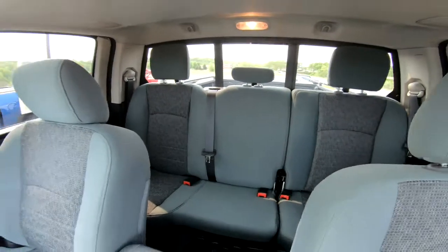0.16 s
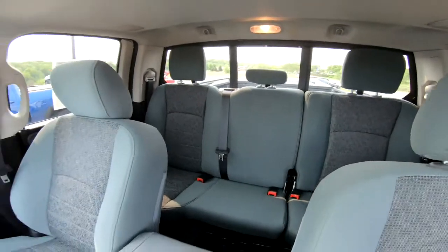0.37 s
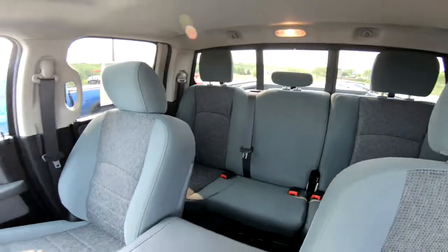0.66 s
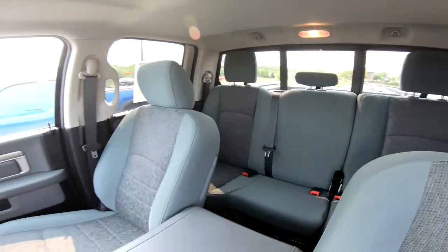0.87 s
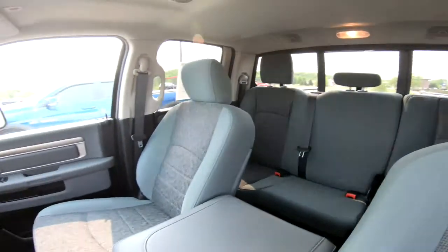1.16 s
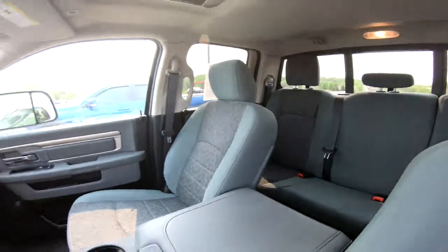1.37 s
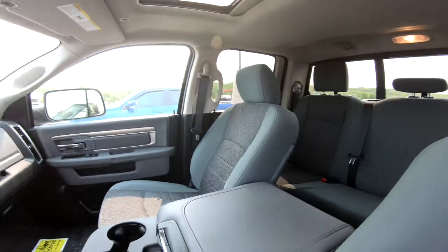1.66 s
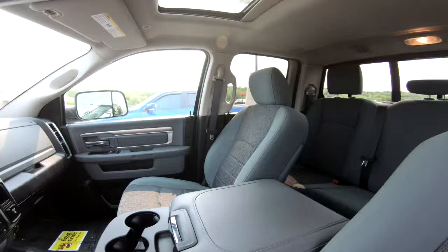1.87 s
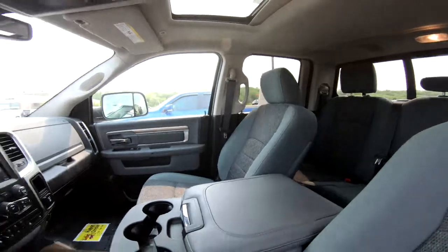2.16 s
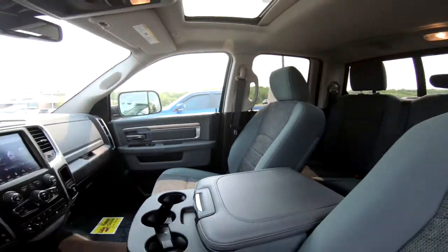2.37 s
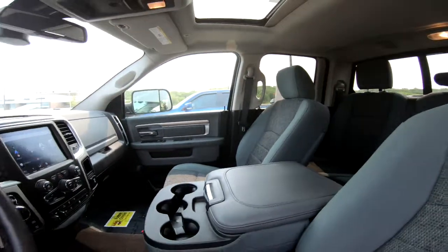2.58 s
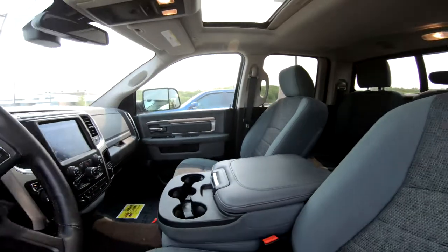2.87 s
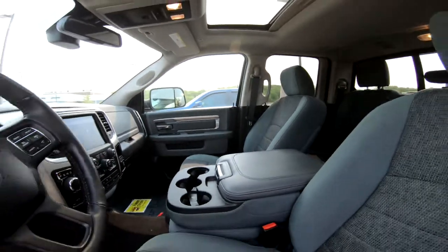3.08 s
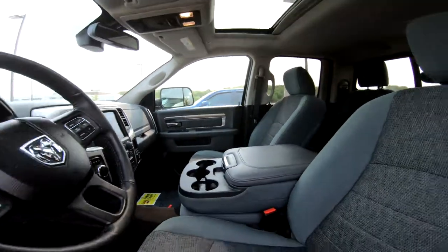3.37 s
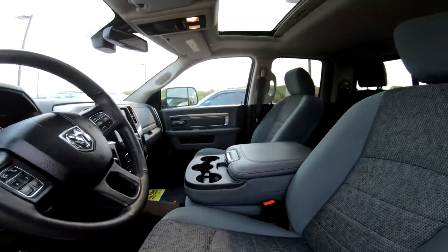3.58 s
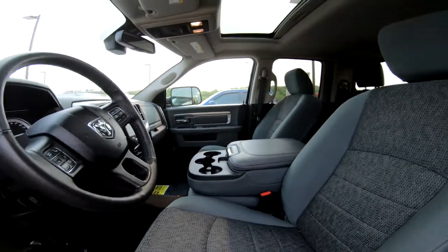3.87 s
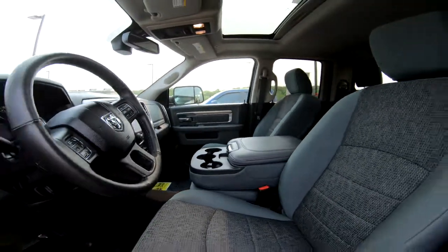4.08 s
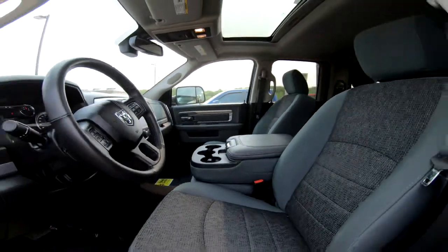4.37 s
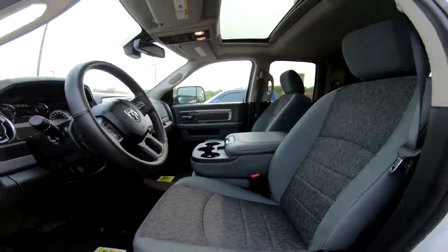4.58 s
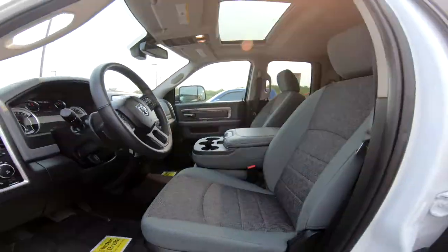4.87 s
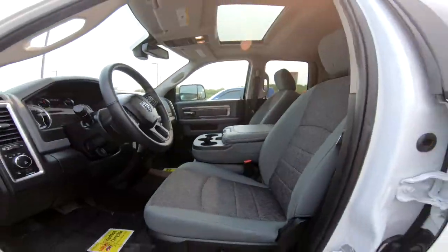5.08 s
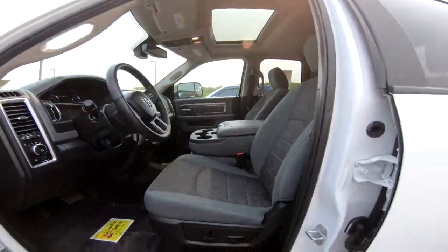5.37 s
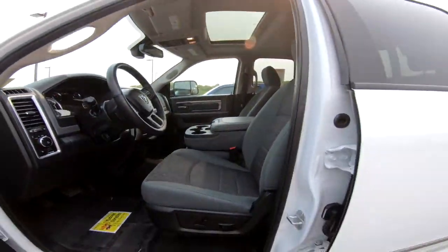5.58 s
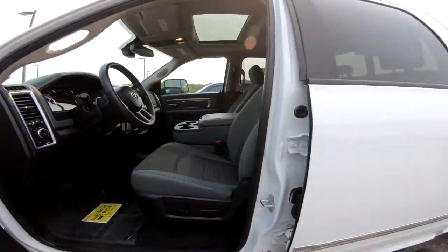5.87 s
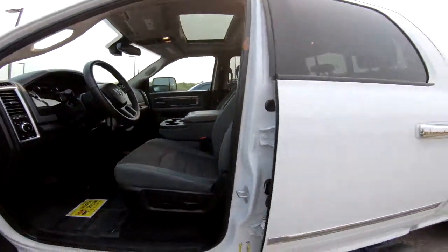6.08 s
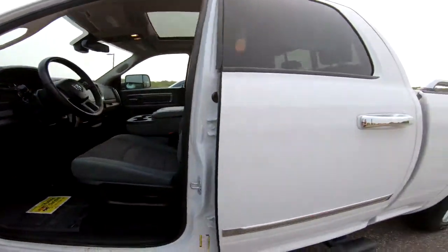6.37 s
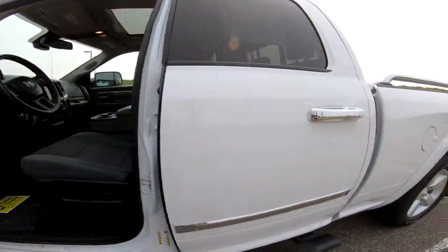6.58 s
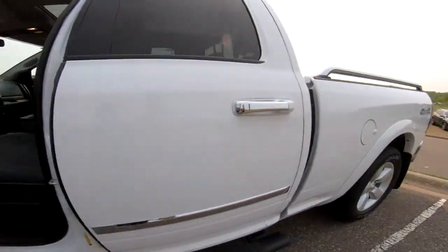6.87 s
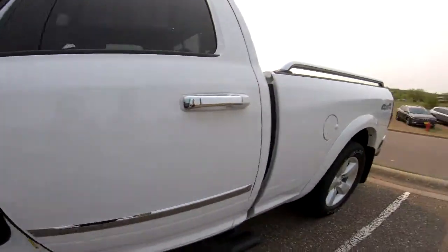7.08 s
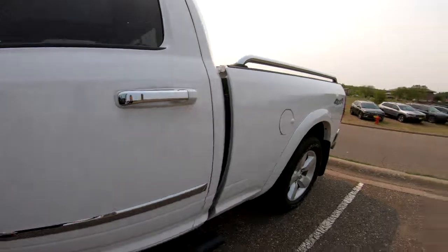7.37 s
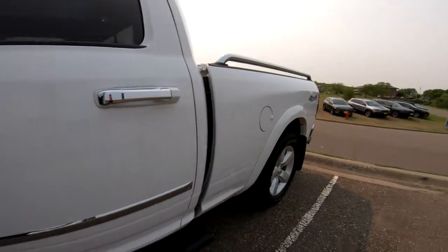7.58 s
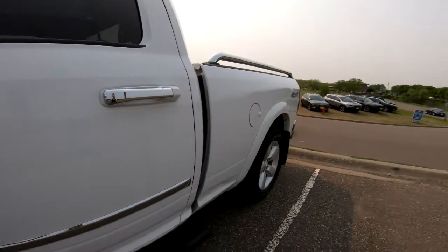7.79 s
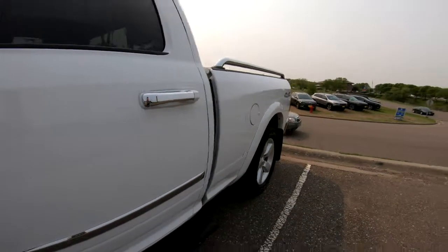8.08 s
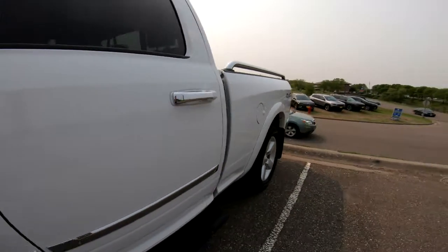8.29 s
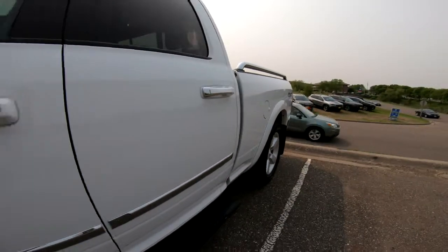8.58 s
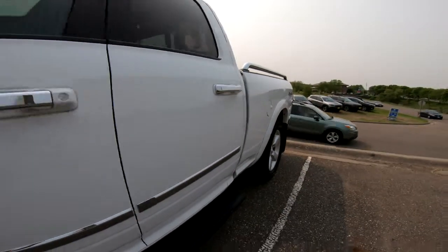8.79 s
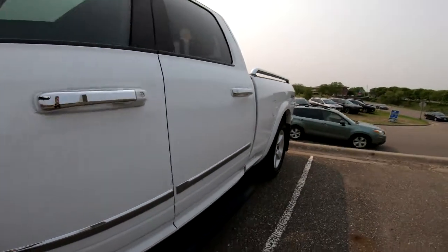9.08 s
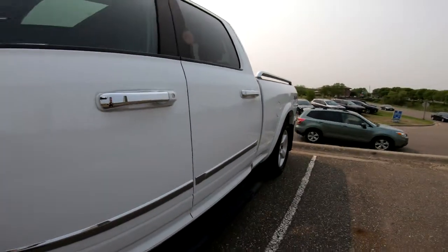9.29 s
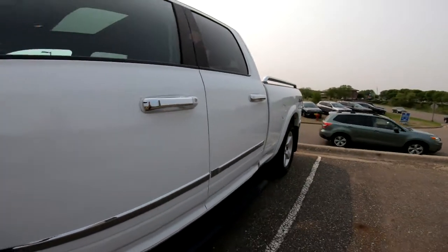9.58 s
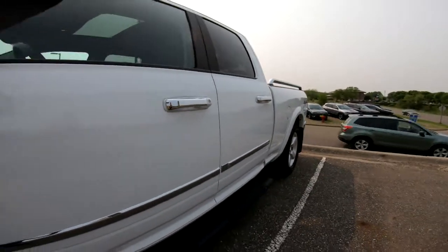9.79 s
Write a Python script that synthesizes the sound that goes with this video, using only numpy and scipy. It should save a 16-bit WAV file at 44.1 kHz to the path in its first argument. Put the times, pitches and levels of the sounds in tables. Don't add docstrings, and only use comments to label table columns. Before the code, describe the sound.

At 0 s the ear is inside an idling pickup: deep, lumpy engine throb, boomy air and dulled traffic roar. From 1 to 5 s it backs out, the cab boom sinks and fades, and the roar grows louder and more open. A quick high bird trill comes at 2.2-2.9 s, with small scuffs near 2.8 s; distant engines drone faintly and fall in pitch from about 2 to 6 s. A close click lands at 5 s, a scuff at 5.6 s, and exhaust swells around 4.8 and 6.4 s. Bird notes return from 5.4 to 7.7 s. At 7.9 s the door slams hard beside the microphone: latch crack, heavy thuds, ringing sheet metal, brief rattle and shudder. The ambience ducks, recovering over a second or more. A car's throbbing drone peaks near 9 s, a faint brake whistle follows at 9.3 s, then bird notes and close taps before 9.93 s.

```python
import sys
import numpy as np
from scipy import signal
from scipy.io import wavfile

SR = 44100
rng = np.random.default_rng(int(sys.argv[2]) if len(sys.argv) > 2 else 0)


def elevation(decibels):
    levels = np.asarray(decibels, float)
    return 10 ** (levels / 20)


def to_wav(sig):
    pcm = np.clip(np.atleast_2d(sig), -1, 1) * 32767
    pcm = np.round(pcm).astype(np.int16)
    wavfile.write(sys.argv[1], SR, pcm.T)


N = 437913
SLAM_S = 7.89


def rms_one(x):
    return x / np.sqrt(np.mean(x ** 2) + 1e-20)


def in_time(rows):
    s, *columns = np.transpose(rows)
    return [np.interp(np.arange(N) / SR, s, column) for column in columns]


def track(rows):
    first, last = rows[0], rows[-1]
    return in_time([(first[0] - .05, first[1], -120), *rows, (last[0] + .05, last[1], -120)])


def at_hz(points, hz):
    points = np.array(points)
    return np.interp(np.log(hz), np.log(points[:, 0]), points[:, 1])


def drift(rate):
    r = np.exp(-80 * np.pi * rate / SR)
    slow = signal.lfilter([1], [1, -2 * r, r * r], rng.standard_normal(N // 40 + 4002))[4000:]
    return np.interp(np.arange(N) / 40, np.arange(len(slow)), rms_one(slow))


def pan(x, lean_db):
    return x * elevation(np.array([[.5], [-.5]]) * lean_db)


def add(out, s, x):
    i = round(s * SR)
    out[..., i:i + x.shape[-1]] += x[..., :N - i]


def widen(mid, side, alike):
    return np.sqrt(1 + alike) * mid + np.sqrt(1 - alike) * side * [[1], [-1]]


def ring(clicks, hz, t60):
    r, w = elevation(-60 / (t60 * SR)), 2 * np.pi * hz / SR
    return signal.lfilter([0, np.sin(w)], [1, -2 * r * np.cos(w), r * r], clicks + 1e-18)


def burst(hz, width_hz, rise, t60, alike):
    t = np.arange(SR // 3) / SR
    r = np.exp(-np.pi * width_hz / SR)
    resonance = [1, 0, -1, 1, -2 * r * np.cos(2 * np.pi * hz / SR), r * r]
    skirt = signal.butter(2, min(hz + width_hz, 15000), fs=SR, output="sos")
    mid, side = signal.sosfilt([resonance, resonance, *skirt], rng.standard_normal((2, len(t))))
    noise = rms_one(widen(mid, side, np.clip(alike, 0, 1)))
    swell = np.sin(np.pi / 2 * np.minimum(t / rise, 1)) ** 2
    return noise * swell * elevation(-60 * np.maximum(t - rise, 0) / t60)


def tone(rows, wobble, rough_db):
    hz, level_db = track(rows)
    phase = 2 * np.pi * np.cumsum(hz * (1 + wobble * drift(1.5))) / SR
    return elevation(level_db + rough_db * drift(3.1)) * np.sqrt(2) * np.sin(phase)


def hum(rows, width_hz):
    hz, level_db = track(rows)
    phase = 2 * np.pi * np.cumsum(hz) / SR
    return elevation(level_db) * (drift(width_hz) * np.sin(phase) + drift(width_hz) * np.cos(phase))


# time in seconds, level against the open lot in dB.
OPENING = [(0, -7.5), (.83, -9), (1.44, -6.5), (2.12, -5), (3.1, -3.5), (3.9, -2), (4.95, 0), (5.6, -0.4),
           (6.3, 1), (7.2, 0.1), (7.86, -0.1), (9.93, -0.2)]
# time in seconds, share facing it 0-1.
TURN = [(0, .8), (.45, 1.0), (.62, 0.7), (1.0, 0), (5.25, 0.05), (5.4, 0.42), (6.6, 0.2), (9.93, 0.15)]


def controls():
    duck_db, duck_in_s, hold_s, recover_db_per_s = -9.5, 0.24, 0.17, 7.5
    t = np.arange(N) / SR - SLAM_S
    back = duck_in_s + hold_s
    times = [0, duck_in_s, back, back - duck_db / recover_db_per_s]
    ducking = np.interp(t, times, [0, duck_db, duck_db, 0])
    return np.array([*in_time(OPENING), t, *in_time(TURN), ducking])


# frequency in Hz, share heard.
FOLLOWS = [(70, 0.45), (300, 0.69), (600, 1.04), (1100, 1.05), (3500, 0.51), (7000, .3)]
# frequency in Hz, rise in dB per second.
CLEARS = [(70, 0.2046), (1100, -0.02), (3500, 1.13), (7000, 1.34), (12500, 1.5)]
# frequency in Hz, gain in dB.
FACING = [(1200, -0.7), (3000, 4.5), (7000, 7.5), (12000, -1)]
# frequency in Hz, share heard.
DUCKS = [(70, 0.81), (300, 0.61), (1100, 0.73), (7000, 0.94)]


def roar_db(hz, moves):
    return np.array([at_hz(share, hz) for share in (FOLLOWS, CLEARS, FACING, DUCKS)]) @ moves


# frequency in Hz, density in dB per Hz.
ROAR = [(11, -42), (18, -9), (42, -8.5), (69, -1), (83, -1.5), (145, -12), (211, -18), (283, -20),
        (482, -28.5), (1130, -26.5), (1300, -30.5), (3050, -41), (5800, -51.5), (8430, -54.5),
        (10700, -95.5), (13900, -99), (22000, -120)]
# frequency in Hz, left-right likeness -1 to 1.
LIKENESS = [(60, 0.96), (130, 0.98), (260, 0.97), (540, 0.88), (1130, 0.14), (2360, 0.47), (4930, 0.43),
            (10300, -0.35)]
# frequency in Hz, left over right in dB.
LEAN = [(60, 1.5), (140, -0.5), (330, 0.5), (780, -5), (1850, -4.5), (4360, -3.0), (10300, -4)]
# time in seconds, share of the ear inside 0-1.
INSIDE = [(0, 1.0), (1.5, 0.6), (3.0, 0.42), (4.5, 0.11), (5.5, 0.09), (9.93, 0.04)]
# frequency in Hz, gain in dB.
CAB_COLOUR = [(25, 9.5), (40, 3.5), (65, -2.5), (120, -4), (160, 2), (200, -3), (250, -0.5), (500, 0.5),
              (800, 1.5), (1100, -1.5), (1600, 2.5), (4000, 0.5)]


def traffic(moves, patchy_db):
    edges = 18 * 2 ** (np.arange(30) / 3)
    inside, = in_time(INSIDE)
    white = rng.standard_normal((2, 2, N + SR))
    together = drift(3.5)
    bands = []
    for k, (low, high) in enumerate(zip(edges, edges[1:])):
        band = signal.butter(2, [low, high], "band", fs=SR, output="sos")
        mid, side = signal.sosfilt(band, white[k % 2])[:, SR:]
        hz = np.sqrt(low * high)
        move_db = roar_db(hz, moves)
        move_db = move_db - move_db.mean() + inside * at_hz(CAB_COLOUR, hz)
        flicker_db = patchy_db * (0.44 * together + drift(12.0))
        gain = elevation(at_hz(ROAR, hz) + move_db + flicker_db)
        alike = np.clip(at_hz(LIKENESS, hz), -1, 1)
        bands.append(pan(gain * widen(mid, side, alike), at_hz(LEAN, hz)))
    steep = signal.cheby2(8, 24, 11200, fs=SR, output="sos")
    return elevation(-27) * signal.sosfilt(steep, rms_one(sum(bands)))


def air(moves):
    band = signal.butter(4, [11800, 14000], "band", fs=SR, output="sos")
    hiss = rms_one(signal.sosfilt(band, rng.standard_normal(N)))
    return elevation(-80 + roar_db(12500, moves) + 3.5 * drift(6.0)) * hiss


def wind(rumble_db):
    band = signal.butter(2, [16, 45], "band", fs=SR, output="sos")
    lumps = signal.sosfilt(band, rng.standard_normal((2, N)))
    return elevation(rumble_db - 14 + 3.0 * drift(2.7)) * rms_one(lumps)


# time in seconds, pitch in Hz, level in dB.
FAR_TRUCK = [(3.2, 92, -32), (3.7, 91.45, -28.5), (5.0, 89.85, -35), (6.1, 88.6, -38), (6.5, 87, -55)]
# time in seconds, pitch in Hz, level in dB.
FAR_CAR = [(2.2, 290, -61.5), (2.8, 284, -51), (4.0, 274.9, -49.5), (5.0, 269, -49.5), (5.6, 264, -58)]


def far_engines():
    return tone(FAR_TRUCK, wobble=0.0042, rough_db=2.0) + tone(FAR_CAR, wobble=0.0029, rough_db=3.5)


# time in seconds, pitch in Hz, level in dB.
DRONE = [(8.1, 309, -52), (8.5, 308, -44), (9.05, 305, -40), (9.4, 298, -41), (9.93, 289, -43.5)]


def passing_car():
    throb_hz, throb_peak_s = 4.73, 9.05
    t = np.arange(N) / SR - throb_peak_s
    beat = np.cos(np.pi * throb_hz * t + .08 * drift(2.2))
    upper = [(s, 1.09 * hz, level_db - 5) for s, hz, level_db in DRONE]
    line = tone(DRONE, wobble=0.00396, rough_db=2.5) * (0.24 + 1.3 * beat ** 2)
    return line + hum(upper, width_hz=14) * (0.91 + 0.22 * beat ** 2)


def brake():
    start_s, length_s, hz, level_db = 9.25, .3, 6042, -59.5
    flutter_hz, depth_db = 10.5, 2.5
    flutter_db = -depth_db * np.cos(2 * np.pi * flutter_hz * (np.arange(N) / SR - start_s))
    fades = [(0, -12), (.12, -5), (.88, -4), (1, -12)]   # (share of the length, dB)
    rows = [(start_s + u * length_s, hz, level_db + fade_db) for u, fade_db in fades]
    return elevation(flutter_db) * tone(rows, wobble=.0005, rough_db=1.2)


# time in seconds, peak in dB, pitch in Hz.
NEAR_TRILL = [(2.1949, -64, 4270), (2.2603, -52.5, 4260), (2.3316, -47, 4130), (2.4119, -45.5, 4330),
              (2.489, -47, 4300), (2.5646, -47, 4270), (2.6514, -47, 4290), (2.733, -45.5, 4290),
              (2.772, -50, 4250), (2.8174, -48, 4370), (2.9074, -46, 4300)]
# time in seconds, peak in dB, pitch in Hz.
FAR_TRILL = [(5.428, -47, 4230), (5.5483, -50, 4550), (5.7074, -50, 4620), (5.7813, -48, 4310),
             (5.84, -46, 3500), (6.0494, -48, 3900), (6.2063, -53, 4480), (6.3011, -48.5, 4300),
             (6.35, -46, 3420), (6.58, -45, 4230), (6.7516, -47, 3870), (6.8164, -46, 4280),
             (6.8987, -45, 4200), (6.998, -52, 4100), (7.153, -45, 4250), (7.2489, -45.5, 4200),
             (7.3377, -41, 4220), (7.438, -41.5, 4180), (7.5313, -48, 4150), (7.6694, -47, 3890),
             (9.4973, -45, 4480), (9.6839, -44, 4400), (9.7418, -42.5, 4170)]


def bird(notes, trim_db, lean_db):
    out, t = np.zeros((2, N)), np.arange(round(.034 * SR)) / SR
    u = t / t[-1]
    for s, peak_db, hz in notes:
        wander = rng.standard_normal((2, 12))
        quaver, burr = (np.interp(u, np.linspace(0, 1, 12), w) for w in wander)
        arch = 1.012 + 0.045 * (u - .4) + 0.008 * quaver
        arch = arch - 0.093 * np.exp(-u / .09) - .16 * np.exp((u - 1) / 0.076)
        voice = np.sin(2 * np.pi * np.cumsum(hz * arch) / SR)
        note = voice * np.sin(np.pi * u) ** .5 * elevation(2.4 * burr)
        add(out, s - .003, pan(elevation(peak_db + trim_db) * note, lean_db))
        for lag, side_db in rng.uniform([.002, -8], [.03, 8], (4, 2)):
            echo = elevation(peak_db + trim_db - 10 - 410 * lag) * note
            add(out, s - .003 + lag, pan(echo, side_db))
    return out


# multiple of crank speed, level over the rumble in dB.
ORDERS_HEARD = [(3, -13.5), (4, -13), (7, -4.5), (12, -20.5), (14, -14)]


def idle(rumble_db):
    idle_hz = 10.0
    turns = np.cumsum(idle_hz * (1 + 0.00575 * drift(0.63))) / SR
    orders = 0
    for k, level_db in ORDERS_HEARD:
        swell = elevation(level_db + 3.5 * drift(1.14))
        orders = orders + swell * np.sin(2 * np.pi * (round(k) * turns + rng.random()))
    return elevation(rumble_db) * orders


# time in seconds, peak in dB.
SWELLS = [(2.6, -34), (3.6, -31), (4.8, -24), (6.4, -26.5), (7.5, -47.5), (9.25, -26.5), (9.93, -31)]


def exhaust():
    note_hz, swell_s, base_db = 79.14, 0.26, -47
    s = np.linspace(0, N / SR, 100)
    power = elevation(2 * base_db)
    for at, peak_db in SWELLS:
        power = power + elevation(2 * peak_db) * np.exp(-((s - at) / swell_s) ** 2)
    return hum([(a, note_hz, 10 * np.log10(p)) for a, p in zip(s, power)], width_hz=1.7)


# time in seconds, pitch in Hz, level in dB.
CAB_BOOM = [(0.0, 205.3, -42.5), (.8, 194.5, -42), (1.5, 182, -43.5), (2.3, 172.2, -44.5),
            (3.2, 171.5, -40.5), (4.2, 165, -50)]


def cab_boom():
    return hum(CAB_BOOM, width_hz=16.8)


# time in seconds, level in dB, centre in Hz, decay t60 in seconds.
SCUFFS = [(0.0, -58, 8950, 0.046), (.823, -51, 3300, 0.098), (2.775, -49, 2900, 0.1),
          (2.785, -49, 4260, 0.097), (4.915, -54, 6000, .033), (4.966, -45, 3200, 0.022),
          (4.965, -51, 6160, .023), (5.58, -45, 3500, 0.13), (6.23, -51, 5000, .15),
          (9.209, -41, 3500, 0.032), (9.25, -50, 5500, .049), (9.811, -40, 7800, 0.25),
          (9.835, -40, 7000, 0.082), (9.889, -37.5, 6660, .2)]
# time in seconds, level in dB.
RUSTLES = [(5.3, -63), (9.62, -57)]


def scuffs():
    out = np.zeros((2, N))
    for s, level_db, hz, t60 in SCUFFS:
        add(out, s, pan(elevation(level_db) * burst(hz, 0.6 * hz, .065 * t60, t60, alike=0.87), -1.5))
    cloth_hz = 4500
    for s, level_db in RUSTLES:
        add(out, s, elevation(level_db) * burst(cloth_hz, 0.96 * cloth_hz, .12, 0.8, alike=0.36))
    return out


# time in seconds, level in dB, pitch in Hz, decay t60 in seconds.
KNOCKS = [
    (9.8935, -24, 1400, .022),
    (4.9655, -34, 3000, .015),
    (7.8897, -14, 2050, .024),
    (9.836, -19, 52, .1),
]


def knocks():
    out, tap = np.zeros((2, N)), np.zeros(SR // 10)
    tap[:9] = np.hanning(9) / 4
    for s, level_db, hz, t60 in KNOCKS:
        body = ring(tap, hz, t60) + .5 * ring(tap, 0.89 * hz, 0.78 * t60)
        add(out, s, elevation(level_db) * body)
    return out


# time in seconds, direction +1 or -1, level in dB, thud in Hz.
BLOWS = [(7.8913, 1, -9, 283), (7.894, -1, -14, 70), (7.9027, 1, -6, 210), (7.902, 1, -6.5, 62),
         (7.9075, 1, -6, 150), (7.9105, -1, -11, 36), (7.9318, -1, -7, 300), (7.934, 1, -12, 48),
         (7.9368, 1, -12, 200), (7.957, -1, -13, 200), (7.963, 1, -16, 100), (7.984, -1, -21, 397),
         (8.005, 1, -24.5, 319)]
# frequency in Hz, level in dB, decay t60 in seconds.
PANEL = [(189, -10, 0.11), (239, -6, 0.08), (290, -8, 0.1), (352, -6, 0.083), (412, -8, 0.082),
         (470, -5, 0.088), (606, 2, 0.063), (727, -1.5, 0.066), (880, -1, .05), (977, -4, .05),
         (1180, 10.5, 0.067), (1260, -8, .05), (1410, -10, .05)]


def blows():
    out, click = np.zeros((2, N)), 1. * (np.arange(SR // 3) == 0)
    soft = np.exp(-2 * np.pi * 900 / SR)
    blow = signal.lfilter([(1 - soft) ** 2], [1, -2 * soft, soft ** 2], click)
    for s, direction, level_db, thud_hz in BLOWS:
        thud_t60 = .024 + 6.0 / thud_hz
        add(out, s, np.sign(direction) * elevation(level_db) * ring(blow, thud_hz, thud_t60))
        hardness_db = 6 * np.log2(thud_hz / 250)
        looseness_db = 30 * (s - SLAM_S)
        panel_db = level_db - 17 + hardness_db + looseness_db
        shape = (2, len(PANEL))
        strengths = elevation(rng.normal(0, 6.2, shape)) * rng.choice([-1, 1], shape)
        for (hz, mode_db, t60), left, right in zip(PANEL, *strengths):
            right = left if hz < 700 else 0.61 * right
            add(out, s, elevation(panel_db + mode_db) * ring(blow, hz, t60) * [[left], [right]])
    return out


# time in seconds, level in dB, centre in Hz.
CRACKS = [(7.8885, -24, 1950), (7.8915, -25, 3000), (7.896, -41, 2400), (7.893, -20, 1290),
          (7.900, -25, 1200), (7.901, -28.5, 7460), (7.9045, -27, 3000), (7.9095, -25, 2400),
          (7.9285, -35, 5070), (7.930, -25.5, 2300), (7.938, -30, 2400), (7.935, -28, 1000)]
# time in seconds, level in dB, centre in Hz.
RATTLES = [(7.939, -41.5, 6560), (7.944, -41, 5170), (7.952, -34, 700), (7.966, -34, 750),
           (7.983, -37, 1100), (7.984, -37, 523)]


def latch_and_trim():
    out = np.zeros((2, N))
    for rows, width, cycles in ((CRACKS, 1.15, 15.0), (RATTLES, .55, 30.0)):
        for s, level_db, hz in rows:
            crack = burst(hz, width * hz, .0025 + 1.2 / hz, 0.037 + cycles / hz, alike=0.28)
            add(out, s, pan(elevation(level_db) * crack, 4.4))
    return out


# centre in Hz, level in dB, decay t60 in seconds.
SHUDDER = [(150, -34, 0.82), (300, -30.5, 0.37), (600, -23, 0.21), (1200, -33, 0.2), (2400, -41.5, 0.32),
           (4800, -42, .26), (8500, -56.5, .26)]


def shudder():
    out = np.zeros((2, N))
    for hz, level_db, t60 in SHUDDER:
        shake = burst(hz, 1.4 * hz, 0.011, t60, alike=at_hz(LIKENESS, hz))
        add(out, 7.895, pan(elevation(level_db) * shake, 2.3))
    return out


def door():
    return blows() + latch_and_trim() + shudder()


def scene():
    moves = controls()
    rumble_db = -26.5 + roar_db(70, moves)
    road = traffic(moves, patchy_db=0.84) + air(moves) + wind(rumble_db)
    others = far_engines() + passing_car() + brake()
    birds = bird(NEAR_TRILL, trim_db=-2.5, lean_db=-5) + bird(FAR_TRILL, trim_db=-6.5, lean_db=-7.0)
    pickup = idle(rumble_db) + exhaust() + cab_boom()
    housing = signal.butter(2, 8800, fs=SR, output="sos")
    close = signal.sosfilt(housing, scuffs() + knocks() + door())
    return road + others + birds + pickup + close


def roll_off(x):
    return signal.sosfilt(signal.butter(12, 14131, fs=SR, output="sos"), x)


def record(dry):
    mix = .95 * np.tanh(dry / .95)
    return roll_off(mix)


dry = scene()
out = record(dry)
to_wav(out)
```